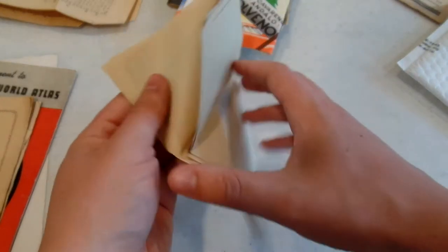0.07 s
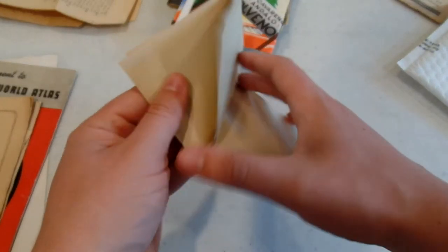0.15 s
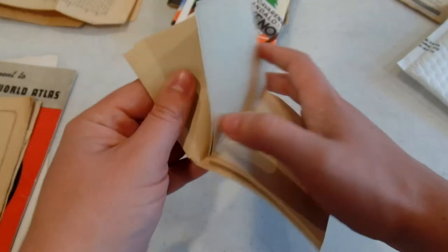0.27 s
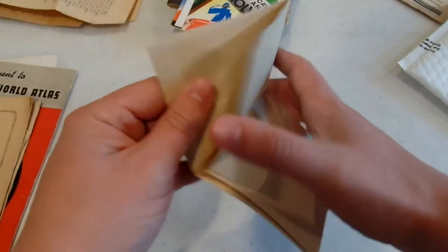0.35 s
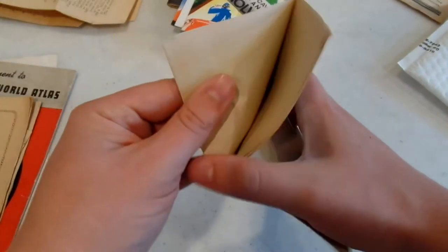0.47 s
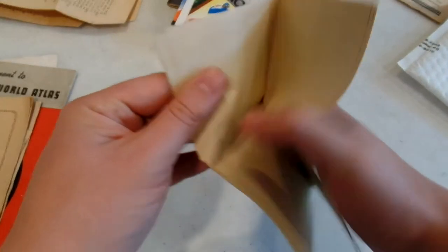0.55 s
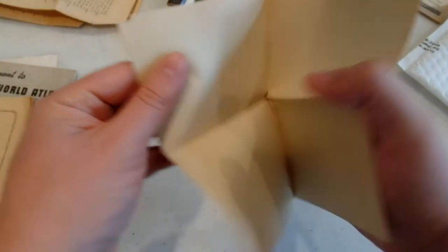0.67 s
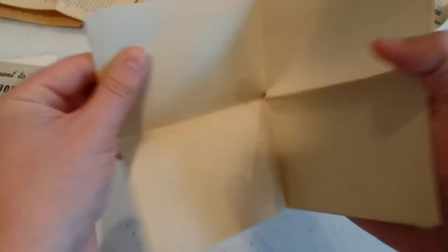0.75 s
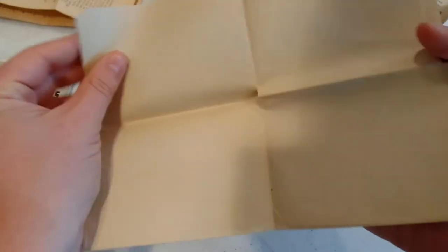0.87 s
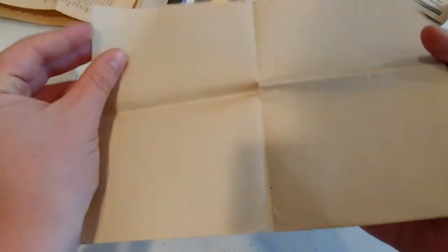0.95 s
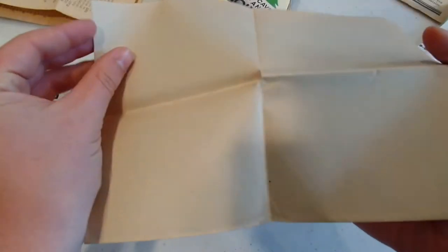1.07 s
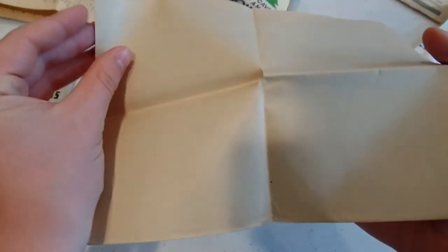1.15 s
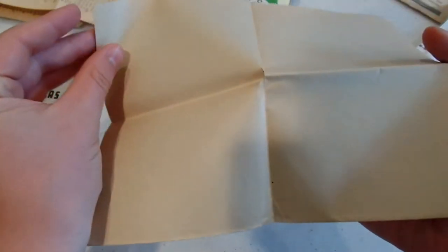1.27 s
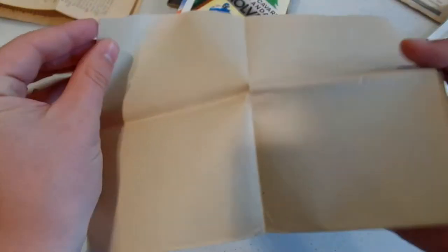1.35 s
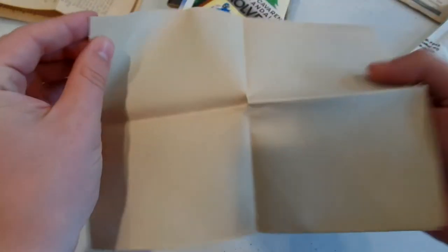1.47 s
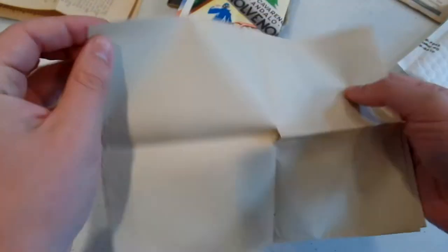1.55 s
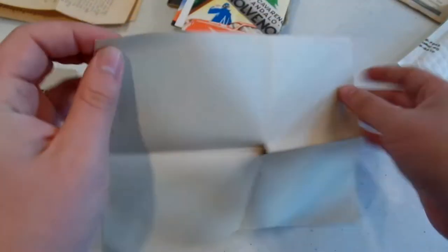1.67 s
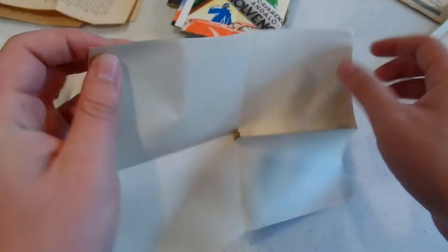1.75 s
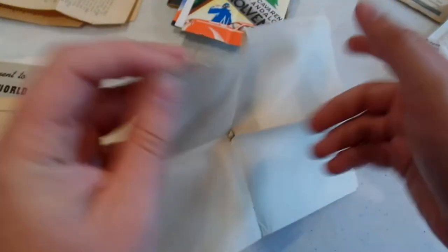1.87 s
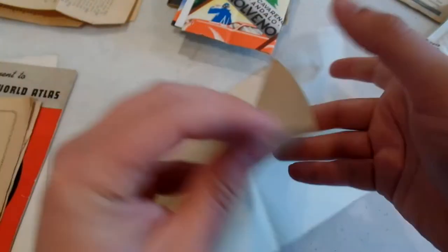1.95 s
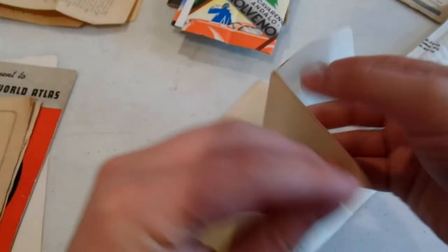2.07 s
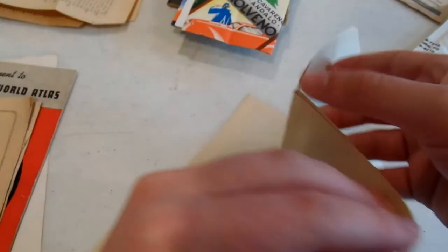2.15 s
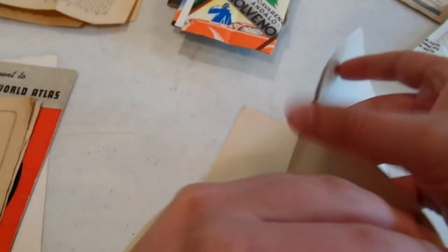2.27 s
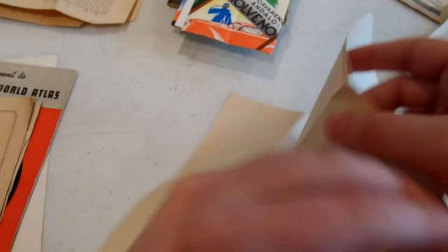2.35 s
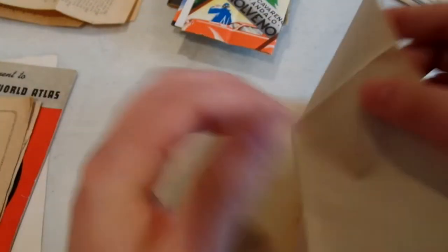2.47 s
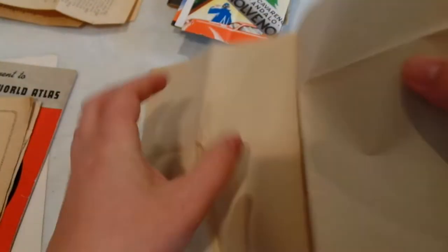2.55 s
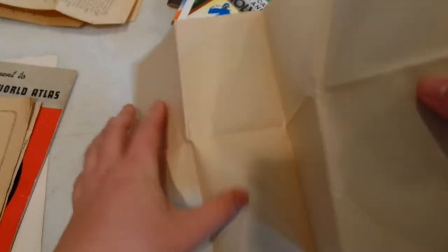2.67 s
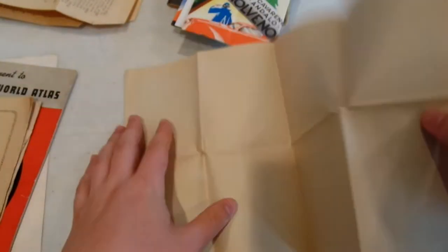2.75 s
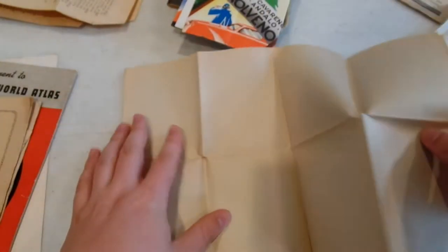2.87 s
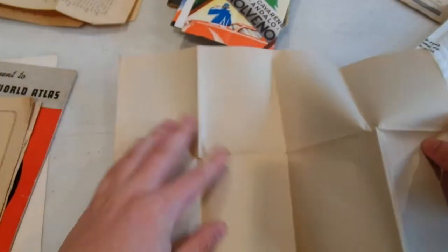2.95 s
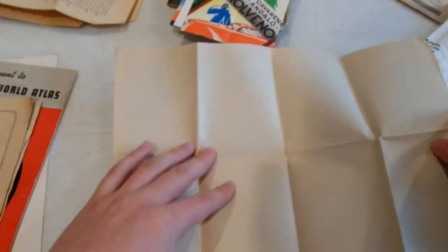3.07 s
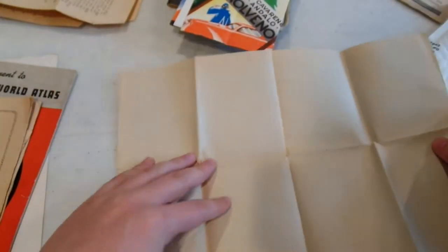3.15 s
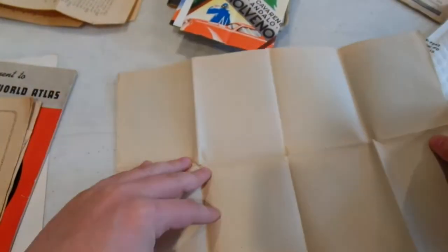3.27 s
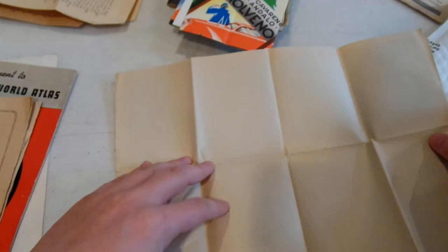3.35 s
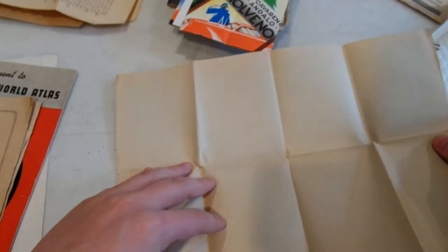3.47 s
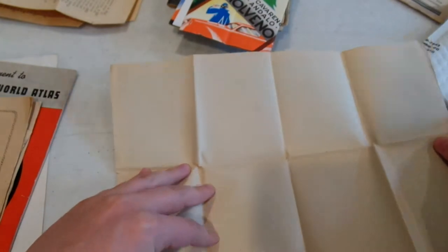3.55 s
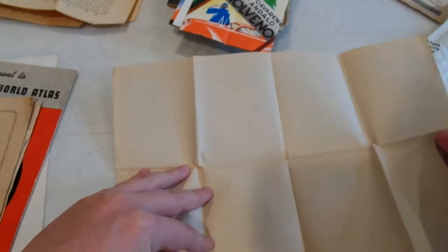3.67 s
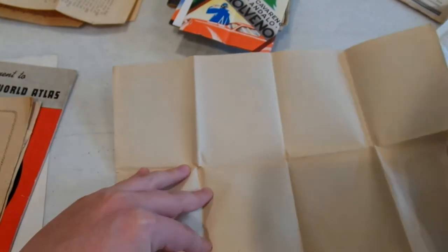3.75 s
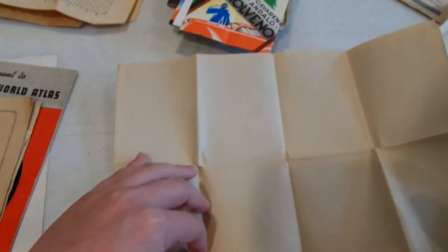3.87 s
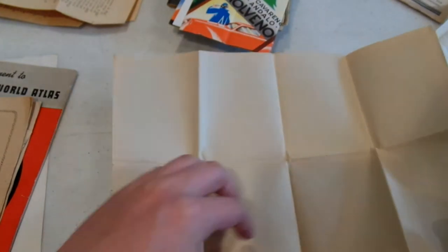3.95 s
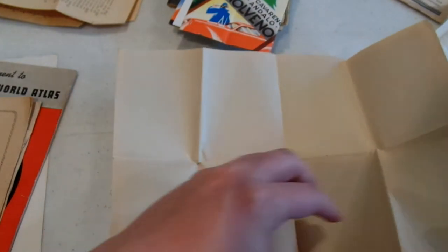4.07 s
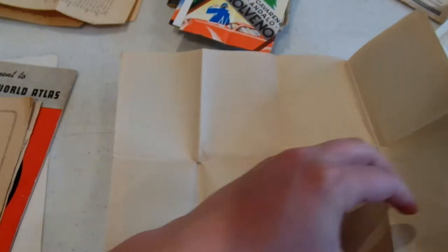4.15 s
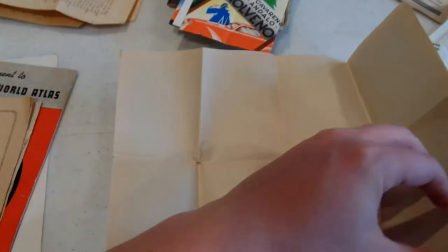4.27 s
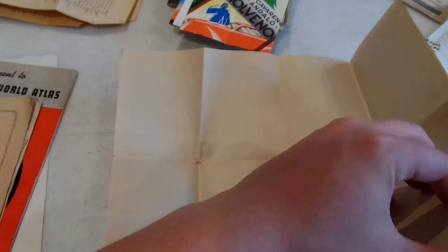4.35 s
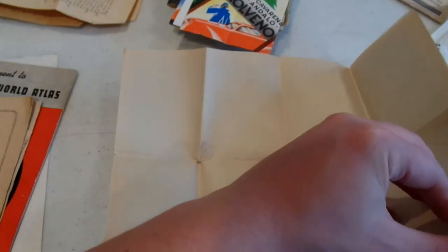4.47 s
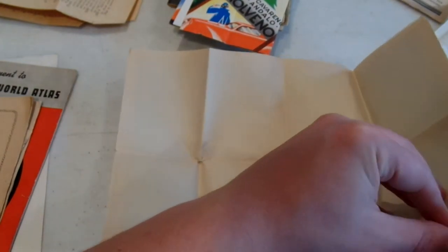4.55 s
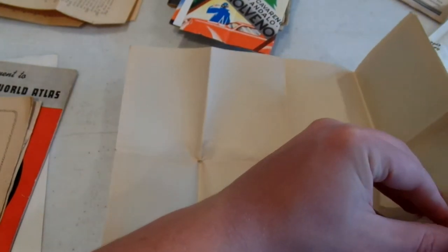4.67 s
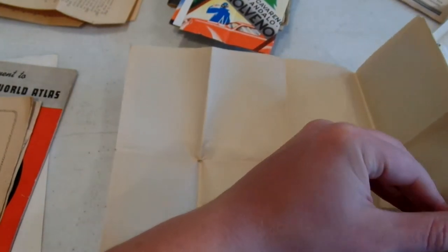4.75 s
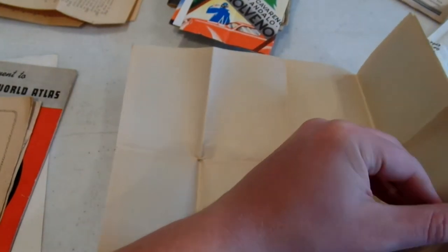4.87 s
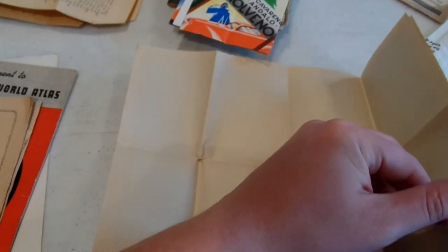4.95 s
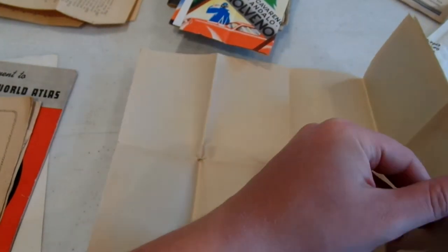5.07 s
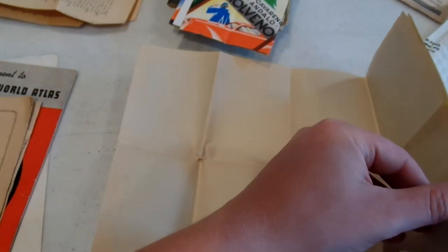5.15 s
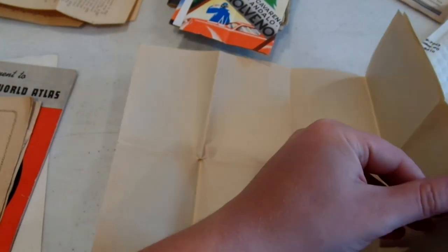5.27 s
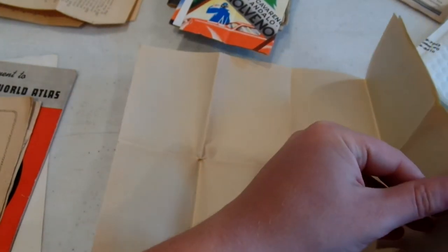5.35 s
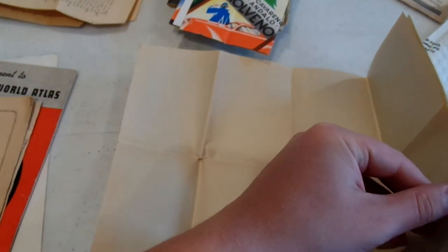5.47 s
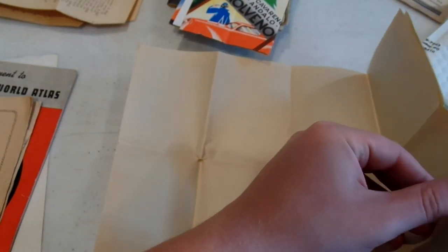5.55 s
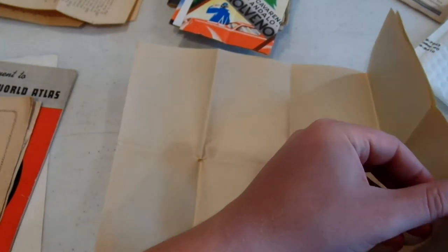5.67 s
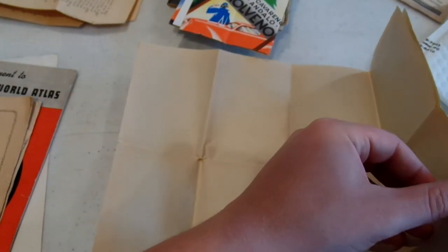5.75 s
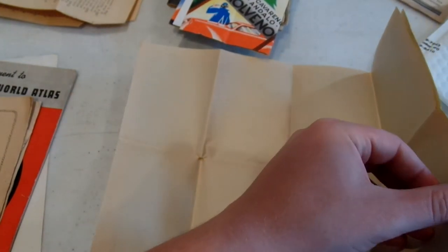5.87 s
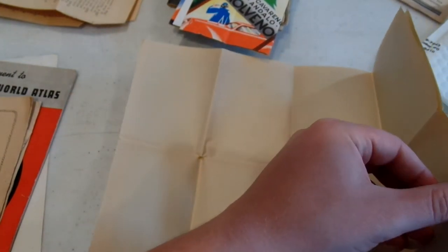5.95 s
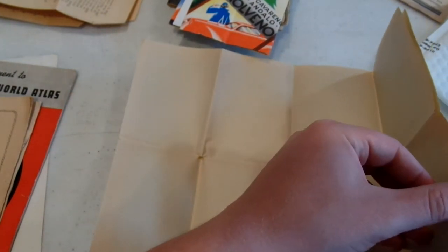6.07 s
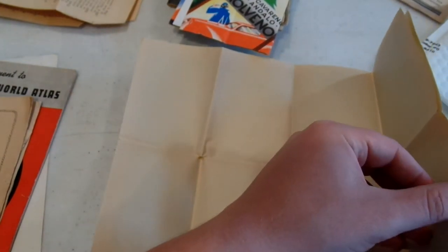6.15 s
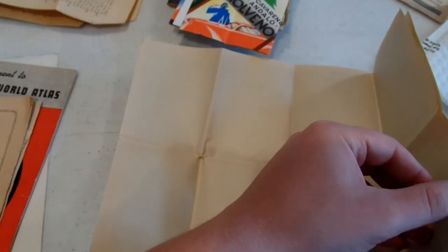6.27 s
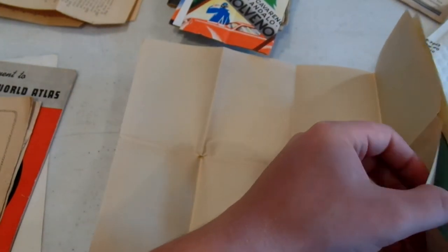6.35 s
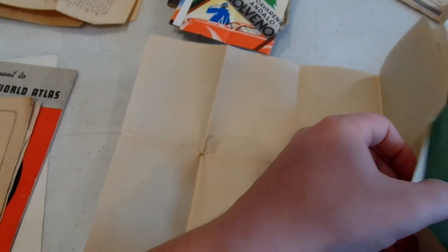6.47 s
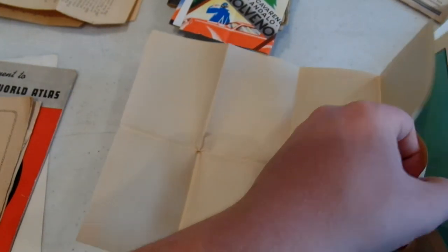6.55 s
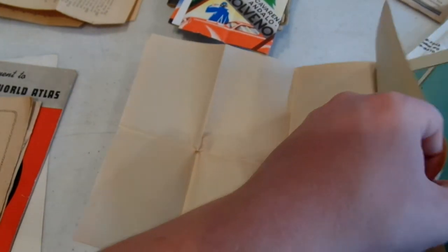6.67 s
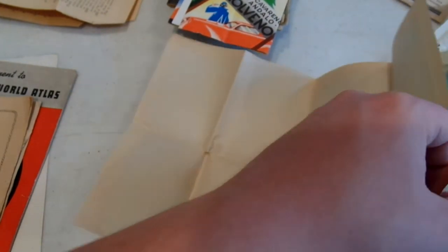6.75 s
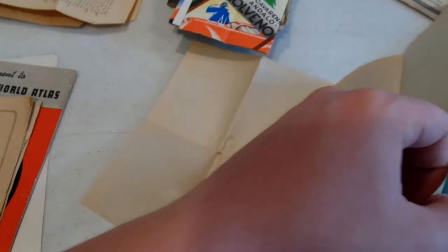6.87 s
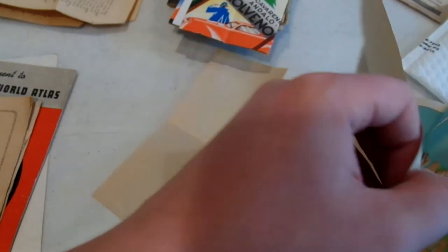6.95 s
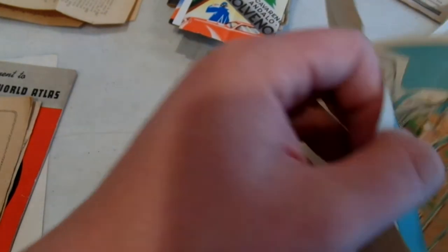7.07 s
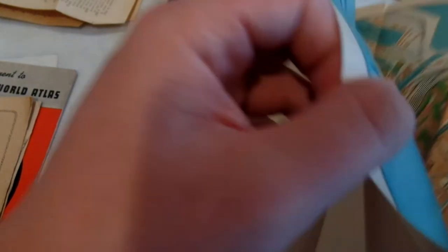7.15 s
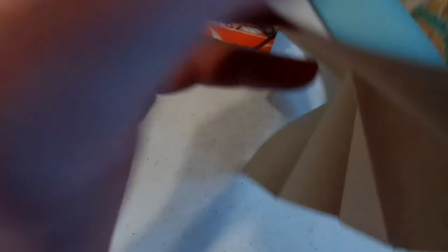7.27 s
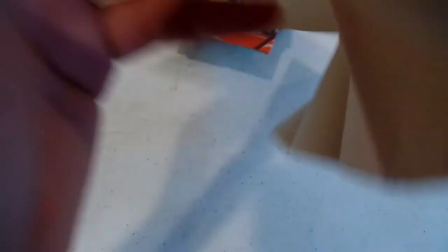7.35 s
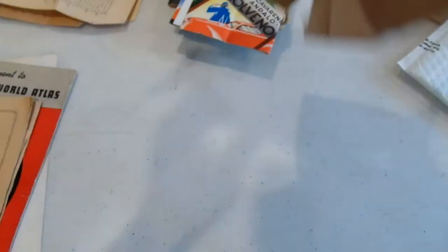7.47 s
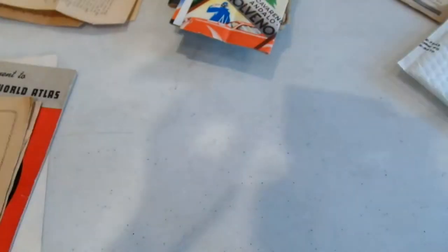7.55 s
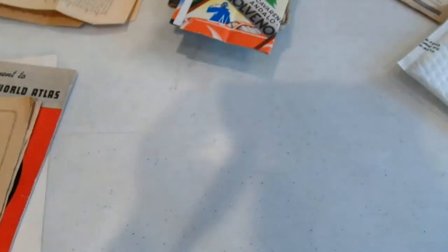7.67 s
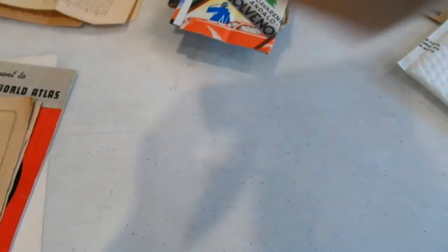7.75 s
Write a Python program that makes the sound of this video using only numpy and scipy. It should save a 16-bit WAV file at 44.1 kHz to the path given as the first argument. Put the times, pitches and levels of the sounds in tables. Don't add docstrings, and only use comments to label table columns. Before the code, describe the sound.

Close to a small mono microphone in a quiet room, an old folded sheet is opened with grainy rustling and scattered sharp snaps. It is pressed and smoothed on a table with dull creaks and soft pats, picked at faintly, then gathered up in a dense burst of loud crackles.

```python
import sys
import numpy as np
from scipy import signal
from scipy.io import wavfile
from scipy.ndimage import uniform_filter1d, minimum_filter1d

SR = 44100
rng = np.random.default_rng(int(sys.argv[2]) if len(sys.argv) > 2 else 0)


def to_linear_factor(level_db):
    exponent = np.asarray(level_db, float) / 20
    return 10 ** exponent


def put_to_file(sound):
    columns = np.atleast_2d(sound).T
    safe = np.clip(columns, -1, 1)
    whole_steps = np.round(safe * 32767)
    wavfile.write(sys.argv[1], SR, whole_steps.astype(np.int16))


N = 344421

# t/s, peak level/dB, ring f/Hz, thump level/dB, crisp edge level/dB
OPENING_SNAPS = [(0.501, -21, 7050, -51, -37), (0.555, -14.5, 5340, -55, -39), (0.726, -21, 740, -28, -58),
                 (0.738, -23, 915, -52, -49), (0.886, -13, 8040, -40, -23), (1.167, -23.5, 4080, -44, -38),
                 (1.390, -20, 3960, -33, -40), (1.484, -17, 2960, -25, -22), (1.508, -5, 6200, -16, -7),
                 (1.552, -22, 2500, -30, -50), (1.571, -15, 920, -28.5, -55), (1.641, -16, 3220, -26, -32),
                 (2.049, -25.5, 940, -37, -62), (2.313, -20, 2460, -44, -60), (2.673, -18, 800, -31, -70),
                 (2.785, -10.5, 3020, -33, -43), (2.813, -19, 870, -20, -70), (2.85, -11, 2880, -33, -43),
                 (2.942, -9.5, 7540, -25, -33), (2.981, -9, 2550, -27, -35)]
SMOOTHING_SNAPS = [(3.268, -11.5, 3850, -30, -22), (3.438, -15, 970, -26, -66),
                   (3.492, -9.5, 2520, -33, -32), (3.818, -10, 2380, -29, -58),
                   (3.896, -25.5, 835, -37, -52), (3.94, -28.5, 2490, -45, -82),
                   (4.479, -15, 2700, -30.5, -58), (4.734, -27.5, 2150, -38, -82),
                   (5.122, -25.5, 2070, -40, -81), (5.405, -23.5, 4370, -32, -30),
                   (5.437, -24, 3020, -41, -36), (5.481, -28, 2120, -37, -62), (5.612, -25, 2460, -54, -87),
                   (5.897, -18, 3300, -42, -45), (6.291, -36, 2800, -53, -49), (4.116, -37, 2100, -46, -81),
                   (6.239, -34.5, 1060, -50, -82)]
LIFTING_SNAPS = [(6.452, -7.5, 3280, -46, -20), (6.538, -6, 3420, -18.5, -25.5),
                 (6.628, -5, 2880, -28, -17), (6.659, -17, 2750, -30, -45), (6.7534, -5.5, 2000, -21, -37),
                 (6.984, -16, 1670, -38, -58), (7.028, -13.5, 1640, -22.5, -42),
                 (7.096, -20, 850, -35, -64), (7.166, -17.5, 2430, -24, -48), (7.246, -7, 2310, -58, -46),
                 (7.287, -14, 1280, -23, -28), (7.304, -23, 7900, -24, -31), (7.328, -14, 2520, -49, -27),
                 (7.347, -10, 3300, -40, -48), (7.467, -11.5, 2040, -45, -28), (7.529, -13, 3200, -35, -35),
                 (7.544, -12, 2380, -41, -27), (7.572, -14, 5250, -42, -23), (7.654, -7, 1036, -30, -46),
                 (7.674, -21, 3390, -34, -32), (7.705, -11, 2820, -41, -35.5),
                 (7.7311, -12.5, 4500, -41, -26), (7.773, -15, 7400, -41, -26)]
# t/s, peak level/dB, f/Hz, width/Hz, t60/s
EARLY_CRACKS = [(0.0345, -24.5, 2490, 3000, .008), (0.3446, -31, 2500, 1200, .008),
                (0.3447, -23, 15000, 3000, .006), (0.7402, -24, 7500, 3000, .008),
                (1.0006, -29, 8000, 3000, .008), (1.3214, -34, 9000, 3000, .008),
                (1.3875, -28, 600, 500, 0.013), (1.391, -22.5, 3960, 900, .015),
                (1.3955, -20.5, 2200, 2500, .015), (1.4855, -18.5, 3000, 1800, .008),
                (1.5015, -21, 3500, 3000, 0.014), (1.5088, -9, 4200, 1200, 0.012),
                (1.5092, -8.5, 6360, 1500, 0.015), (1.642, -26, 2800, 1500, 0.011),
                (1.666, -28.5, 874, 400, 0.058), (1.9899, -27, 7140, 3000, .008),
                (2.2503, -30, 1070, 900, 0.025), (2.7048, -27, 794, 600, .015),
                (2.7217, -21, 1050, 700, 0.017), (3.4395, -19.5, 2480, 900, 0.02),
                (3.4615, -16, 960, 200, 0.027), (3.4925, -9.5, 2440, 800, 0.012),
                (5.4095, -22, 3750, 1100, 0.012), (5.413, -41, 1800, 200, .2),
                (5.44, -30, 2990, 600, 0.017), (5.482, -33, 2200, 900, .015)]
# t/s, peak level/dB, f/Hz, width/Hz, t60/s
LATE_CRACKS = [(6.453, -14, 4570, 1500, 0.022), (6.5383, -13, 6960, 1500, .025),
               (6.629, -19, 835, 400, 0.045), (6.633, -28, 2720, 200, .2), (6.656, -22, 2770, 300, .07),
               (6.659, -22.5, 950, 350, 0.034), (6.7533, -9.5, 1980, 300, 0.033),
               (6.76, -37, 1995, 120, 0.27), (7.0964, -25, 830, 500, 0.09), (7.1, -27.5, 436, 220, 0.34),
               (7.1882, -17, 4500, 4000, .015), (7.2468, -11, 3300, 2200, 0.013),
               (7.263, -20, 3000, 900, .012), (7.2935, -18, 7500, 3000, .015),
               (7.3045, -8, 2460, 1600, 0.015), (7.3044, -9, 8100, 1500, .015),
               (7.3295, -12, 6500, 4500, .004), (7.4125, -17, 4000, 4000, .02),
               (7.63, -11, 5500, 6000, .005), (7.654, -3, 5600, 4000, 0.012),
               (7.6564, -18, 980, 400, 0.032), (7.7056, -12.5, 5800, 2000, 0.023),
               (7.7323, -22, 2070, 600, .012), (7.7342, -2, 12000, 7000, .005),
               (7.754, -24.5, 900, 1500, 0.0049), (7.7745, -0.5, 7200, 3500, 0.0063),
               (7.7743, -18, 1930, 700, 0.021)]
# t/s, peak level/dB, f/Hz, width/Hz, t60/s
MORE_CRACKS = [(0.8868, -7.5, 7960, 9000, 0.012), (0.888, -23, 616, 700, 0.014),
               (2.6733, -13.5, 1585, 2500, 0.0071), (2.7862, -17.5, 870, 347, .025),
               (2.8505, -13, 4750, 2500, 0.0094), (2.942, -11, 7900, 2000, 0.0075),
               (2.9795, -11.5, 4420, 4500, 0.025), (2.9828, -12, 4960, 5000, .004),
               (3.0075, -16.5, 2500, 2500, .006), (3.2685, -9.5, 3650, 2500, 0.0083),
               (3.4495, -14, 940, 200, 0.028), (3.4755, -16, 1500, 1500, .01),
               (3.4932, -26, 8350, 4000, 0.0064), (3.554, -31, 2500, 700, .01),
               (4.7588, -36, 7300, 3000, .008), (5.3181, -38, 1840, 1200, .01),
               (6.0778, -40, 3040, 1500, .01), (7.0849, -37, 4900, 1200, .03), (7.388, -23, 800, 700, .01),
               (7.4678, -13, 4000, 4500, .006), (7.482, -20.5, 3480, 900, .04),
               (7.523, -20, 2000, 910, 0.013), (7.5725, -19.5, 5200, 900, .015),
               (7.3008, -11, 5000, 7000, .012), (3.7312, -29, 2440, 1200, 0.011),
               (6.6295, -9, 4100, 5000, 0.0099), (2.9422, -18, 13500, 5000, .006),
               (2.9803, -13, 13000, 6000, .008), (7.7742, -18, 13500, 5000, .006),
               (0.887, -18, 13500, 5000, .006), (3.2687, -25, 13000, 6000, .006),
               (1.509, -17, 13000, 6000, .008), (6.4525, -20, 12800, 6000, .008),
               (3.818, -22, 2500, 2500, 0.009), (7.675, -19, 8000, 4000, .012),
               (0.924, -32, 3100, 900, .012), (2.7055, -25, 5500, 6000, .008)]
# top t/s, effort level/dB, rise/s, fall/s, crispness level/dB
HAND_STROKES = [(0.0, -39, 0.092, 0.19, -6), (.245, -43, 0.22, 0.77, -3), (.573, -37, 0.061, 0.036, -7),
                (.736, -39.5, 0.04, 0.2, -12), (.862, -38.5, 0.056, 0.03, 1.5),
                (.915, -35, 0.044, 0.038, -3), (1.048, -40.5, 0.11, 0.048, -5.5),
                (1.12, -42.5, 0.044, 0.054, -6), (1.17, -44.5, 0.018, 0.015, -14),
                (1.341, -36, 0.054, 0.33, -7), (1.5, -42.5, 0.085, 0.16, 5),
                (1.654, -31.5, 0.15, 0.047, -6), (1.816, -42, 0.24, 0.06, -6),
                (2.049, -40.5, 0.11, 0.3, -5.5), (2.331, -39, 0.051, 0.2, -6),
                (2.52, -39.5, 0.25, 0.075, -5), (2.72, -34.5, 0.031, 0.098, -6),
                (2.84, -44, .09, 0.26, -16), (2.997, -36, 0.31, 0.088, -11), (3.2, -41.5, 0.38, 0.18, -7),
                (3.285, -38.5, 0.04, 0.041, -5), (3.458, -36.5, 0.096, .17, -8),
                (3.7, -45.5, 0.11, 0.1, -10), (3.825, -44, 0.011, 0.064, -13),
                (3.885, -42.5, 0.083, 0.11, -3.5)]
# top t/s, effort level/dB, rise/s, fall/s, crispness level/dB
FLAT_STROKES = [(4.355, -44.5, 0.041, 0.069, -8), (4.445, -38.5, .035, .03, -6),
                (4.49, -40.5, 0.027, 0.095, -13), (4.59, -48, .04, 0.067, -11),
                (4.747, -54, 0.15, 0.14, -11), (4.917, -49.5, 0.1, 0.19, -8.5),
                (5.136, -52.5, 0.068, 0.15, -30), (5.238, -49.5, 0.039, 0.054, -4),
                (5.34, -49, 0.047, 0.028, -11), (5.416, -39, 0.011, 0.053, -6),
                (5.533, -43.5, 0.058, 0.068, -8), (5.673, -46, 0.029, 0.064, -2.5),
                (5.777, -52, 0.071, 0.15, -3), (5.907, -41.5, 0.03, 0.089, -10),
                (6.096, -50.5, 0.099, 0.031, -5), (6.206, -56.5, .02, 0.2, -4),
                (6.304, -48.5, 0.018, 0.27, -3)]
# top t/s, effort level/dB, rise/s, fall/s, crispness level/dB
LIFT_STROKES = [
    (6.458, -33, 0.0066, 0.15, -5),
    (6.555, -34, 0.057, 0.055, -4),
    (6.645, -31.5, 0.026, 0.059, -19),
    (6.826, -35.5, 0.17, 0.22, -4),
    (7.03, -38.5, 0.43, 0.079, -23),
    (7.234, -30, 0.15, 0.14, -5.5),
    (7.45, -31.5, 0.23, 0.21, -7),
    (7.665, -34.5, 0.32, 0.046, -6),
    (7.738, -46, .04, .012, -9),
    (7.79, -50, .04, .06, 6),
]
# top t/s, level/dB, rise/s, fall/s
FLEXES = [(1.654, -47.5, 0.13, .05), (2.685, -38, 0.029, 0.37), (3.26, -49, 0.13, .06),
          (3.458, -41, 0.028, 0.21), (3.823, -51.5, .011, 0.26), (5.416, -44.5, 0.0084, 0.078),
          (5.633, -52, 0.071, 0.019), (6.458, -35, 0.0047, 0.031), (6.767, -48, 0.036, 0.056),
          (7.105, -42, 0.012, 0.18), (6.93, -44.5, 0.11, 0.18), (7.305, -34, 0.046, 0.052),
          (7.6, -38, 0.43, 0.2), (7.722, -44, 0.044, 0.055)]
# f/Hz, level/dB
SLIDE_SPECTRUM = [(900, -41.5), (1600, -1), (2100, -1), (2600, 0.5), (3300, 0), (4300, -1), (6500, -1.5),
                  (8200, -0.5), (9800, -10), (12000, -12)]
# f/Hz, level/dB
BODY_SPECTRUM = [(90, -72), (200, -3.5), (320, 3), (450, 1.5), (620, -1.5), (950, 2), (1500, -3.5),
                 (2500, -42.5)]
# f/Hz, level/dB
FIZZ_SPECTRUM = [(7000, -43.5), (9500, 5.5), (10500, 3.5), (13000, 2), (14500, 7.5), (15800, 8),
                 (16300, -44)]
# top t/s, rms level/dB, rise/s, fall/s, crisp share level/dB
SCUFFS = [(0.522, -34, 0.0052, .012, -7), (1.504, -27, 0.009, 0.0068, -11),
          (2.728, -30, 0.012, 0.0096, -13), (3.82, -40, 0.0049, .01, -23),
          (5.409, -31.5, 0.0082, 0.0071, -1), (5.44, -36.5, 0.0046, .01, -6),
          (5.768, -44.5, 0.0079, 0.014, -3), (5.898, -35, 0.0063, .012, 1), (6.66, -28, .006, 0.011, -18),
          (7.187, -30.5, 0.0069, 0.0086, 1), (7.295, -25.5, 0.0086, 0.025, -4)]
# t/s, level/dB
GROAN_LEVEL = [
    (3.427, -22),
    (3.44, -33),
    (3.452, -26),
    (3.467, -24.5),
    (3.476, -29),
    (3.49, -38),
    (3.52, -38),
    (3.57, -46),
]
# f/Hz, width/Hz, level/dB
GROAN_MODES = [(940, 115, 7), (735, 260, 8), (468, 27, 2), (1230, 73, 1)]
# t/s, level/dB
PANEL_LEVEL = [
    (3.39, -61),
    (3.419, -41),
    (3.5, -44),
    (3.6, -46.5),
    (3.72, -47),
    (3.78, -59),
    (3.82, -58),
    (3.9, -44.5),
    (3.97, -55),
]
# t/s, peak level/dB, f/Hz
PATS = [
    (0.032, -36, 169),
    (0.725, -36, 444),
    (2.668, -46.5, 350),
    (3.435, -26, 462),
    (3.816, -38, 300),
    (5.894, -38, 266),
    (6.75, -36, 415),
    (7.099, -40, 435),
    (7.286, -33, 286),
    (7.393, -34, 247),
]
# top t/s, level/dB, rise/s, fall/s
WAVES = [
    (.4, -63, .4, 1),
    (1.24, -56.5, 1, 0.11),
    (1.5, -43.5, 0.14, 0.22),
    (1.76, -42.5, 0.095, 0.18),
    (2.7, -51, 0.041, .05),
    (3.22, -60, .2, .8),
    (6.61, -60, 0.33, .6),
    (7.44, -46, 0.19, 0.26),
    (7.72, -44, .15, 0.046),
]
# f/Hz, level/dB
AIR_SPECTRUM = [(12, -27), (25, 4), (50, 8), (90, -3), (200, -15)]
# f/Hz, level/dB
TABLE_SPECTRUM = [(50, -23), (90, -2.5), (140, 3), (220, -1), (400, -31)]
# f/Hz, t60/s
ROOM_T60 = [(200, 0.33), (1000, 0.31), (3000, 0.17), (8000, 0.12), (15000, 0.028)]
# f/Hz, level/dB per Hz
HUM_SPECTRUM = [(18, -61), (30, -3), (239, 5.5), (666, -11), (866, -13.5), (2290, -8.5), (3060, -12),
                (8300, -20.5), (11400, -22), (14400, -44), (16000, -26)]

STILL_DB, CALM_DB = -67, -103


def evened(x):
    return x / np.sqrt(np.mean(x ** 2) + 1e-20)


def peaked(x):
    return x / (abs(x).max() + 1e-12)


def read(points, hz):
    f, value = np.transpose(points)
    return np.interp(np.log(hz + 1), np.log(f + 1), value)


def add(mix, s, sound):
    part = mix[max(round(s * SR), 0):][:len(sound)]
    part += sound[:len(part)]


def colour(x, points, size=2048):
    level_db = read(points, abs(np.fft.fftfreq(size, 1 / SR)))
    log_gain = np.log(to_linear_factor(np.maximum(level_db, -100)))
    response = np.exp(np.conj(signal.hilbert(log_gain)))
    taps = np.fft.ifft(response).real[:size // 2]
    return signal.oaconvolve(x, taps)[:len(x)]


def resonate(x, hz, width_hz):
    turn = np.exp(2j * np.pi * hz * np.arange(len(x)) / SR)
    r = np.exp(-np.pi * width_hz / SR)
    return 2 * (turn * signal.lfilter([1 - r], [1, -r], x / turn)).real


def swells(rows, rest_db):
    s, top_db, rise_s, fall_s = np.transpose(rows)[:, :, None]
    t = np.arange(0, N, 32) / SR
    away = np.where(t < s, (s - t) / rise_s, (t - s) / fall_s)
    power = to_linear_factor(2 * (top_db - 10 * away ** 1.39)).sum(0) + to_linear_factor(2 * rest_db)
    return np.interp(np.arange(N) / SR, t, 10 * np.log10(power))


def snaps(settle_s=0.017, sharpness=11.2, ring_db=-7.5, thump_db=15, crisp_db=13, settle_db=-24):
    t, out = np.arange(2000) / SR - .0009, np.zeros(N)
    creep = to_linear_factor(30000 * np.minimum(t, 0))
    settling = to_linear_factor(settle_db) * np.exp(-t / settle_s) * (t > 0)
    hz_points = [200, 600, 1100, 2600, 4500, 8000, 10300, 14500, 17500]
    creases = OPENING_SNAPS + SMOOTHING_SNAPS + LIFTING_SNAPS
    chance = rng.standard_normal((len(creases), 2, len(t)))
    for (s, peak_db, hz, low_db, high_db), (slip, hiss) in zip(creases, chance):
        t60 = 0.025 + 0.0031 * (low_db + 35) / 20 - 0.0026 * hz / 1000
        burst = peaked(slip * abs(slip) * creep * to_linear_factor(-60 * np.maximum(t, 0) / t60))
        drive = burst + settling * hiss
        low = max(low_db - peak_db + thump_db, -22)
        high = high_db - peak_db + crisp_db
        gains_db = [low - 30, low - 3, low, 0, 0.16 * high, 0.61 * high, high - 7, high, high - 12]
        snap = peaked(colour(drive, np.transpose([hz_points, gains_db]), size=512))
        ring = peaked(resonate(burst, hz, hz / sharpness))
        add(out, s, to_linear_factor(peak_db) * peaked(snap + to_linear_factor(ring_db) * ring))
    return out


def cracks(first=5):
    t, out = np.arange(5000) / SR, np.zeros(N)
    rows = EARLY_CRACKS + LATE_CRACKS + MORE_CRACKS
    chance = rng.standard_normal((len(rows), len(t))) + first * (t == 0)
    for (s, peak_db, hz, width_hz, t60), slip in zip(rows, chance):
        flurry = slip * to_linear_factor(-60 * t / t60)
        patch = resonate(resonate(flurry, hz, width_hz), hz, width_hz)
        add(out, s, to_linear_factor(peak_db) * peaked(patch))
    return out


def handling():
    s, effort_db, rise_s, fall_s, crisp_db = np.transpose(HAND_STROKES + FLAT_STROKES + LIFT_STROKES)
    hiss_db = swells(np.transpose([s, effort_db, rise_s, fall_s]), STILL_DB)
    fizz_db = swells(np.transpose([s, effort_db + crisp_db, rise_s, fall_s]), STILL_DB + 1)
    carried = to_linear_factor(2 * (-47.5 + 0.76 * (hiss_db + 39.0)))
    body_db = 10 * np.log10(carried + to_linear_factor(2 * swells(FLEXES, STILL_DB)))
    return hiss_db, body_db, fizz_db


def patchy(points, patchy_db):
    frames, hz = N // 128 + 5, np.fft.rfftfreq(512, 1 / SR)
    a, b, patches = rng.standard_normal((frames, 257, 3)).T
    patches = uniform_filter1d(patches, size=8, axis=0)
    patches = evened(uniform_filter1d(patches, size=10, axis=1))
    z = (a + 1j * b) * to_linear_factor(read(points, hz)[:, None] + patchy_db * patches)
    return evened(signal.istft(z, nperseg=512, noverlap=384)[1][:N])


def fibres(per_s, spread_db, clump_db):
    clumps = evened(uniform_filter1d(rng.standard_normal(N), size=500))
    sizes = to_linear_factor(spread_db * np.minimum(rng.exponential(1, N), 5) + clump_db * clumps)
    return evened(sizes * rng.choice([-1., 1.], N) * (rng.random(N) < per_s / SR))


def rustle():
    hiss_db, body_db, fizz_db = handling()
    slips = fibres(per_s=2400, spread_db=0.0, clump_db=2.5)
    layers = [(SLIDE_SPECTRUM, hiss_db + 0.11, .45),
              (BODY_SPECTRUM, body_db - .3, .35),
              (FIZZ_SPECTRUM, fizz_db + 0.16, .4)]
    out = np.zeros(N)
    for points, level_db, grainy in layers:
        scrape = np.sqrt(1 - grainy) * patchy(points, patchy_db=3.5)
        grains = np.sqrt(grainy) * evened(colour(slips, points))
        out += to_linear_factor(level_db) * (scrape + grains)
    return out


def scuffs(grain=0.31, lead=2.1, curve=0.88):
    t, out = np.arange(6000) / SR - 1 / 20, np.zeros(N)
    chance = rng.standard_normal((len(SCUFFS), len(t)))
    for (s, level_db, rise_s, fall_s, crisp_db), grit in zip(SCUFFS, chance):
        grit = grit * abs(grit) ** grain
        hiss = evened(colour(grit, SLIDE_SPECTRUM, size=512))
        fizz = evened(colour(grit, FIZZ_SPECTRUM, size=512))
        rise = np.clip(1 + t / (lead * rise_s), 0, 1) ** curve
        swell = rise * np.exp(-np.maximum(t, 0) / fall_s)
        add(out, s + t[0], to_linear_factor(level_db) * (hiss + to_linear_factor(crisp_db) * fizz) * swell)
    return out


def groan():
    s, level_db = np.transpose(GROAN_LEVEL)
    t, out = s[0] + np.arange(6500) / SR, np.zeros(N)
    slips = to_linear_factor(6.6 * rng.exponential(1, len(t))) * (rng.random(len(t)) < 600 / SR)
    soft = resonate(resonate(slips, 680, 720), 680, 670)
    modes = sum(to_linear_factor(db) * evened(resonate(soft, hz, width_hz)) for hz, width_hz, db in GROAN_MODES)
    modes = signal.lfilter(*signal.butter(2, 350, "high", fs=SR), modes)
    modes = modes / np.sqrt(uniform_filter1d(modes ** 2, size=600) + 1e-9)
    level = to_linear_factor(np.interp(t, s, level_db))
    add(out, s[0], level * modes * signal.windows.tukey(len(t), .08))
    return out


def panel(hz=2550, width_hz=750):
    slips = fibres(per_s=1200, spread_db=-1.0, clump_db=3)
    sung = resonate(resonate(slips, hz, width_hz), hz, width_hz)
    level_db = np.interp(np.arange(N) / SR, *np.transpose(PANEL_LEVEL), left=-120, right=-120)
    return to_linear_factor(level_db) * evened(sung)


def pats(rise_s=0.0096, t60=0.043):
    t, out = np.arange(5000) / SR, np.zeros(N)
    for s, peak_db, hz in PATS:
        push = (1 - np.exp(-t / rise_s)) * to_linear_factor(-60 * t / t60) * np.sin(2 * np.pi * hz * t)
        add(out, s, to_linear_factor(peak_db) * peaked(push))
    return out


def fanning():
    air = colour(rng.standard_normal(N), AIR_SPECTRUM, size=16384)
    air = air / np.sqrt(uniform_filter1d(air ** 2, size=5000) + 1e-12)
    return to_linear_factor(swells(WAVES, CALM_DB)) * air


def table(below_db=-13, share=0.93):
    level_db = uniform_filter1d(handling()[1], size=4000)
    rumble = evened(colour(rng.standard_normal(N), TABLE_SPECTRUM, size=8192))
    return to_linear_factor(share * level_db + below_db) * rumble


def room(first_s=0.0065):
    taps, size = np.zeros(SR // 2), SR // 40 - 30
    arrivals = round(first_s * SR) + 20 * np.arange(size) + rng.integers(0, 20, size)
    taps[arrivals] = rng.choice([-1., 1.], size)
    hz, t, z = signal.stft(taps, SR, nperseg=256)
    t60 = np.maximum(read(ROOM_T60, hz), .03)[:, None]
    tail = signal.istft(z * to_linear_factor(-60 * t / t60), SR, nperseg=256)[1]
    return tail / np.linalg.norm(tail)


def hum():
    return to_linear_factor(-55) * evened(colour(rng.standard_normal(N), HUM_SPECTRUM, size=8192))


def thin_out(x, streak_db=2.07, odds=0.28, centre_hz=11200, spread_hz=1600):
    hz, t, z = signal.stft(x, SR, nperseg=1024, noverlap=768)
    streaks = evened(uniform_filter1d(rng.standard_normal(z.T.shape).T, size=8, axis=1))
    band, block = np.arange(len(hz)) // 5, np.arange(len(t)) // 9
    chance = rng.random((block[-1] + 1, band[-1] + 1))[block][:, band].T
    dropped = chance < odds * np.exp(-((hz[:, None] - centre_hz) / spread_hz) ** 2)
    z = z * to_linear_factor(streak_db * streaks - 25 * dropped)
    return signal.istft(z, SR, nperseg=1024, noverlap=768)[1][:N]


def scene():
    hits = snaps() + scuffs() + pats() + groan()
    close = cracks()
    steady = thin_out(rustle() + fanning() + hum() + panel() + table())
    tail = to_linear_factor(-12.5) * room()
    echoes = signal.oaconvolve(hits + to_linear_factor(-5.5) * close, tail)[:N]
    mono = hits + close + echoes + steady
    return np.array([mono, mono])


def starve(x, sudden_db=17.5, depth=.97, odds=.5):
    power_db = 10 * np.log10(abs(uniform_filter1d(x ** 2, size=90)) + 1e-12)
    near_db = -minimum_filter1d(-power_db, size=2000, origin=-150)
    hz, t, z = signal.stft(x, SR, nperseg=128)
    faint = np.interp(t, np.arange(N) / SR, 1. * (near_db - power_db > sudden_db))
    band, block = (hz / 800).astype(int), (t * 90).astype(int)
    dropped = (rng.random((block[-1] + 1, band[-1] + 1)) < odds)[block][:, band].T
    treble = (hz > 8800) & (hz < 15000)
    kept = 1 - depth * faint * dropped * treble[:, None]
    return signal.istft(z * kept, SR, nperseg=128)[1][:N]


def low_pass(x):
    return signal.sosfilt(signal.butter(12, 16990, fs=SR, output="sos"), x)


def record(dry):
    edge = signal.firwin(301, 15850, window=("kaiser", 7), fs=SR)
    limited = signal.oaconvolve(dry, edge[None], "same")
    limited = limited + to_linear_factor(-50) * (dry - limited)
    mono = starve(limited[0])
    return low_pass(np.array([mono, mono]))


dry = scene()
out = record(dry)
put_to_file(out)
```